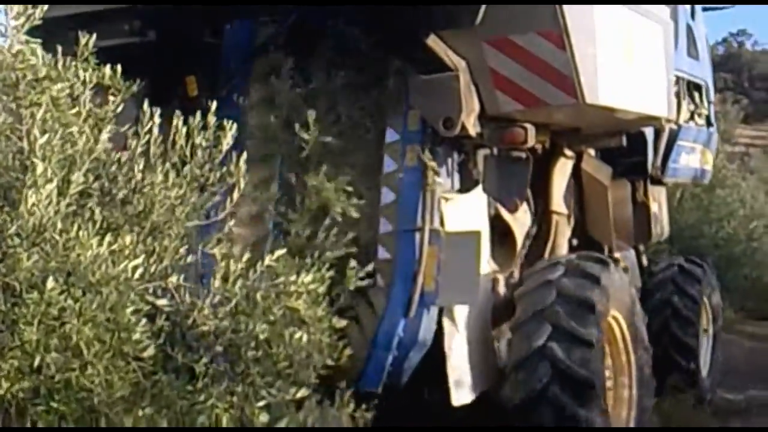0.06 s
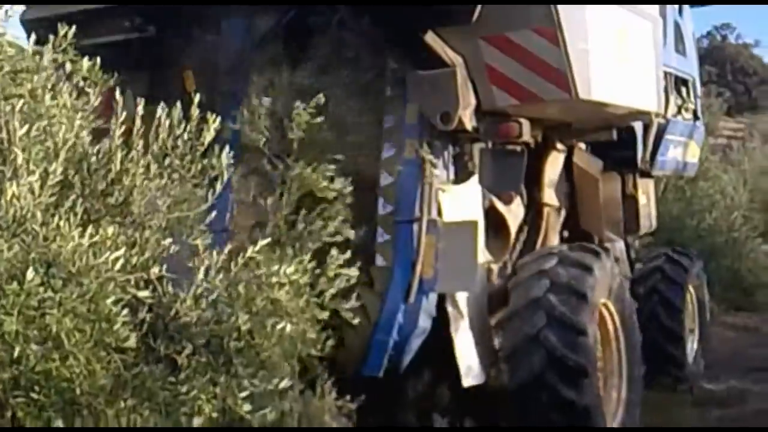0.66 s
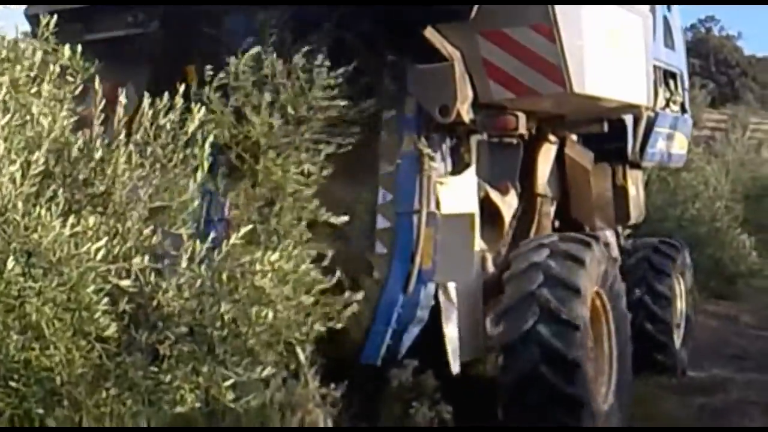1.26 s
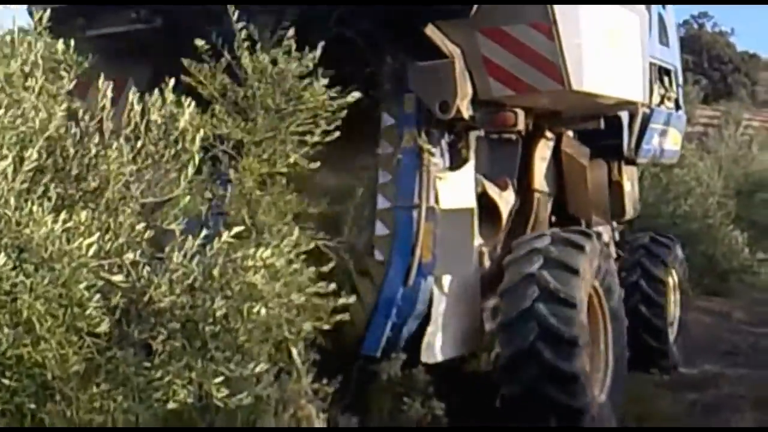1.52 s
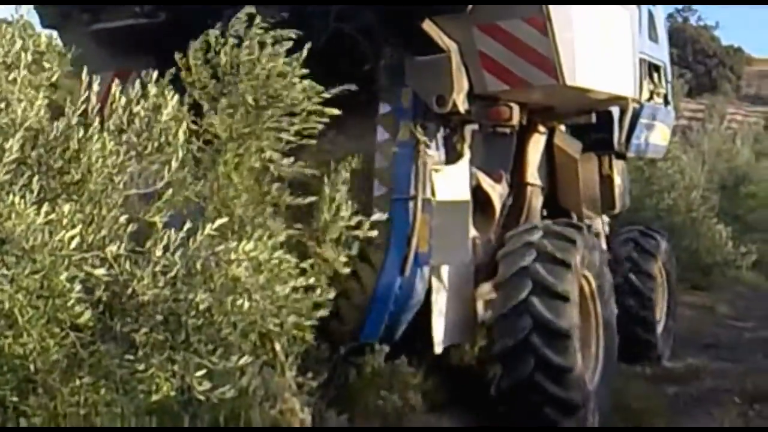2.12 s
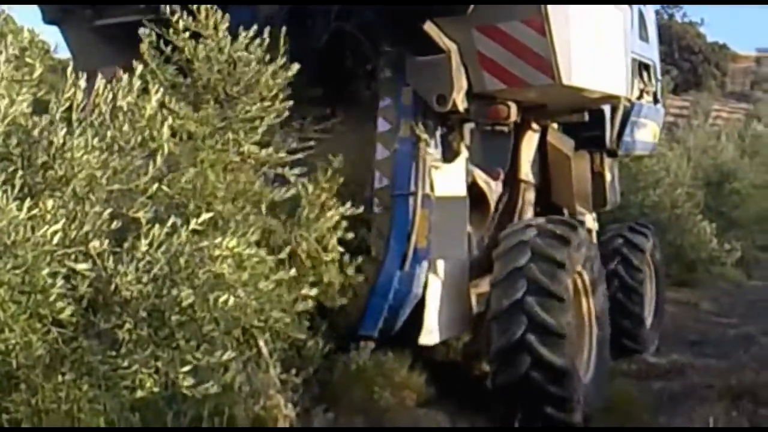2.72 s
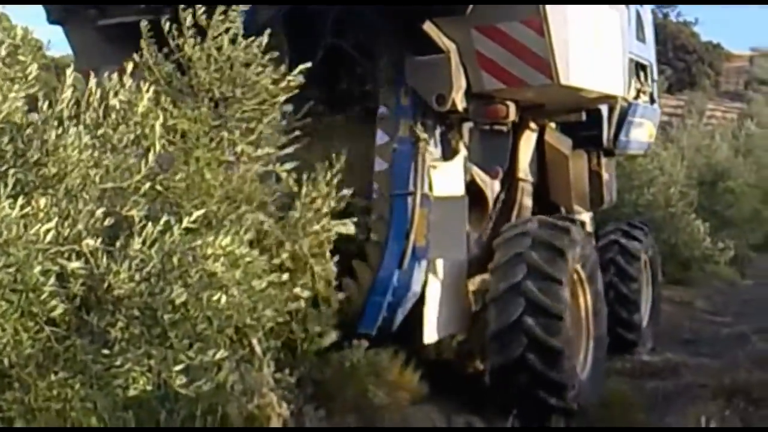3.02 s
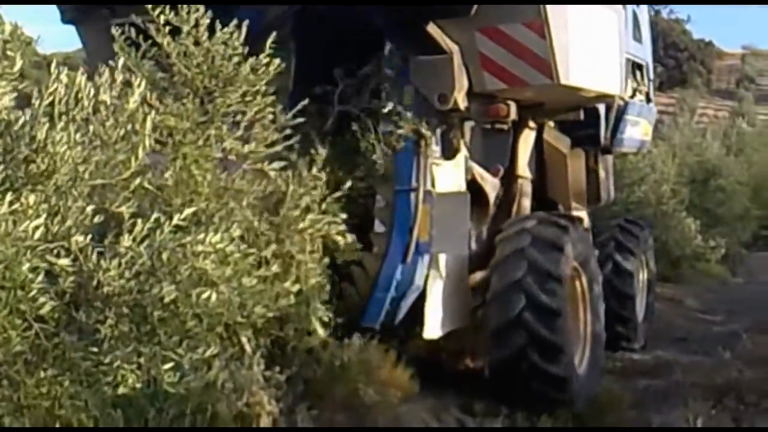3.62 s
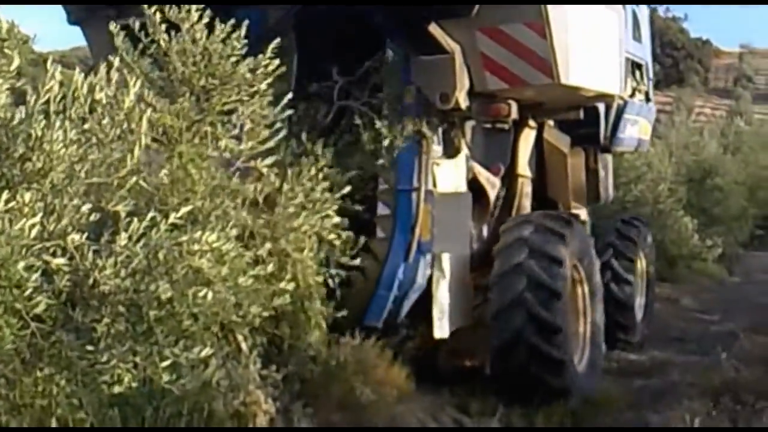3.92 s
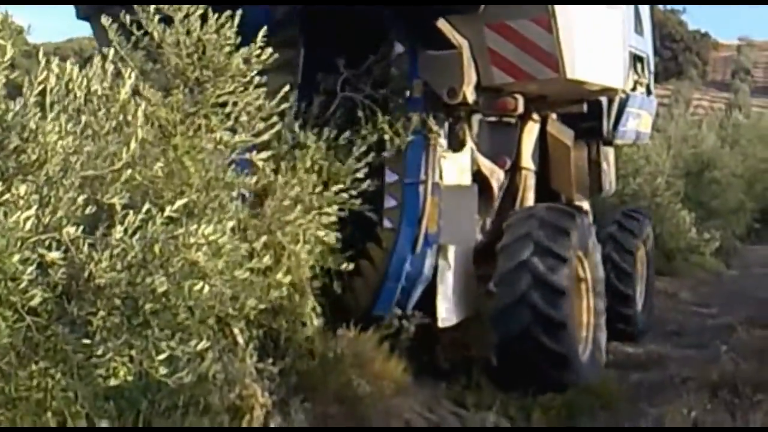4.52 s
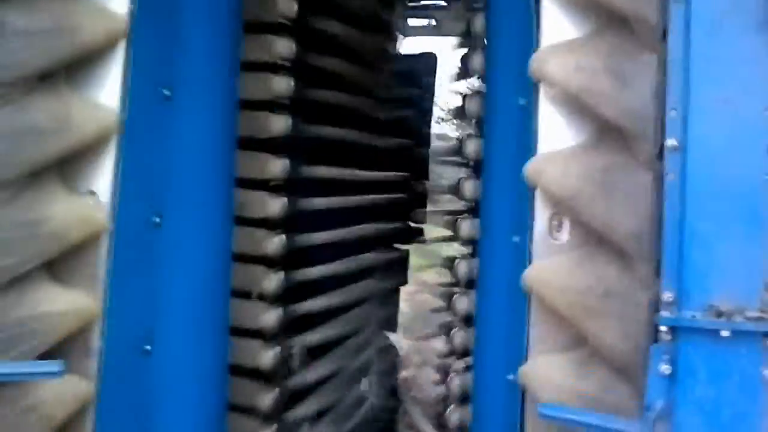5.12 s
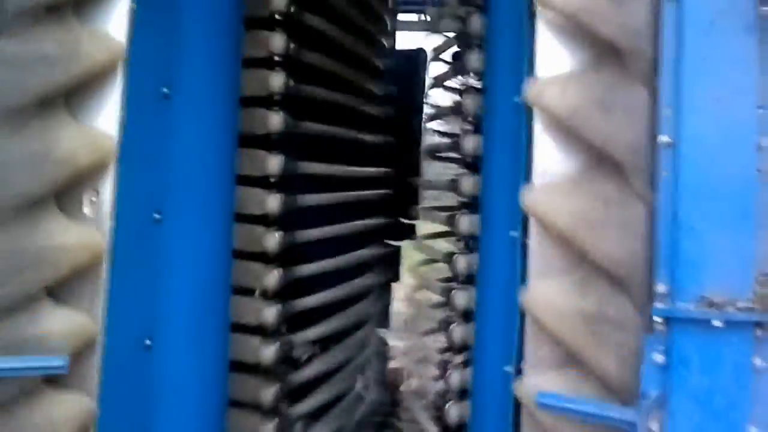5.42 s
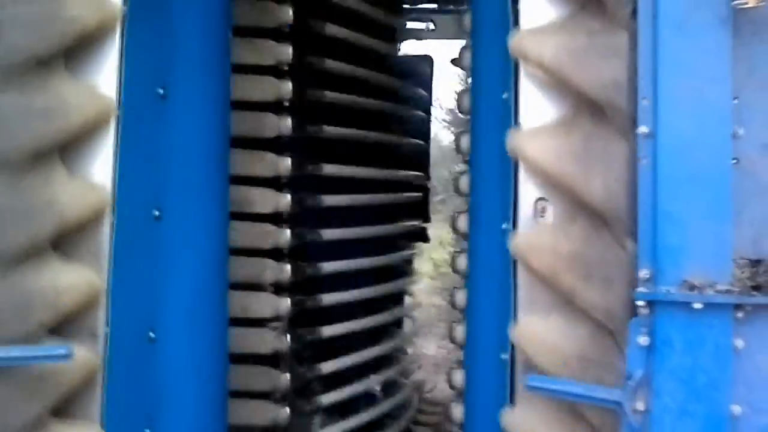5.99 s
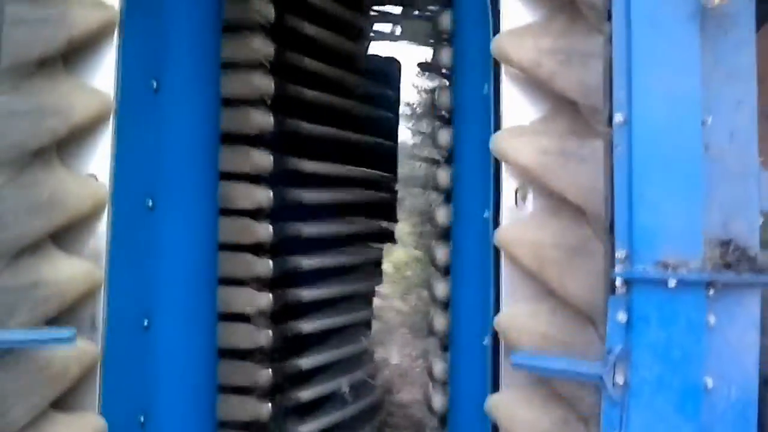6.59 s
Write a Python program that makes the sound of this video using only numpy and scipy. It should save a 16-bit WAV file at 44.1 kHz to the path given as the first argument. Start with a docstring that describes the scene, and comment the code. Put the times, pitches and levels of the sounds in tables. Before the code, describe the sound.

From the start, a large harvester is heard close by outdoors: a loud, steady diesel hum, a roar of air and two blower fans whose low drones beat slowly against each other. Over this, shaker rods thrash the branches about eight times a second, making a dense, throbbing, slightly metallic rustle. A branch squeaks briefly at about 0.8 seconds. Twigs snap at irregular moments, mostly between 0.8 and 2 seconds and again from 4.1 to 4.8. At 5 seconds everything cuts to silence. At about 5.2 seconds the machine returns, heard from its picking tunnel, duller and boxier, with the fan pitched slightly higher. Leaves and fruit gush through with a few snaps around 5.3 seconds, and the roar eases a little near 5.5. Another rustling swell with light clicks comes around 6.5 seconds, and the drone continues to the end, near 6.7 seconds.

```python
"""Olive harvester at work

An olive harvester straddles a tree row: the diesel hums, two blower fans drone and beat,
and shaker rods thrash the branches about eight times a second while twigs snap.
After a short silence it is heard from its picking tunnel, duller, the fan a little faster."""
import sys
import numpy as np
from scipy import signal
from scipy.fft import rfft, irfft
from scipy.io import wavfile

SR = 44100
rng = np.random.default_rng(int(sys.argv[2]) if len(sys.argv) > 2 else 0)


def inscribe(sig):
    """Save sig as 16-bit PCM at rate SR to the path in sys.argv[1].

    A 1-D sig is mono; a 2-D sig holds one channel per row.
    Samples are clipped to [-1, 1] before scaling.
    """
    pcm = np.round(np.clip(np.atleast_2d(sig).T, -1, 1) * 32767)
    wavfile.write(sys.argv[1], SR, pcm.astype(np.int16))


N = 297675
TIME_S = np.arange(N) / SR
BINS_HZ = np.fft.rfftfreq(N, 1 / SR)
ROW_END_S, TUNNEL_START_S, LOAD_EASE_S = 5.0, 5.222, 5.5


def amp(db):
    return 10 ** (np.asarray(db) / 20)


def unit_rms(x):
    return x / np.sqrt(np.mean(x ** 2) + 1e-20)


def curve(rows):
    """Straight lines through (time_s, value) points."""
    return np.interp(TIME_S, *np.transpose(rows))


def colour(x, spectrum):
    """Filter x by a spectrum; rms 1."""
    hz, db = np.transpose(spectrum)
    gain = amp(np.interp(np.log(BINS_HZ + 1), np.log(hz), db))
    return unit_rms(irfft(rfft(x) * gain, N))


def wander(rate_hz):
    """Random drift up to rate_hz; rms 1."""
    return unit_rms(irfft(rfft(rng.standard_normal(N)) / (1 + (BINS_HZ / rate_hz) ** 4), N))


def band(x, centre_hz, width_hz):
    """Bell-shaped band of x; rms 1."""
    hz = np.fft.rfftfreq(len(x), 1 / SR)
    return unit_rms(irfft(rfft(x) * np.exp(-((hz - centre_hz) / width_hz) ** 2), len(x)))


def ruffle(flutter, flutter_hz):
    """Complex gain: turbulent air shakes a tone's strength and phase."""
    return 1 + flutter * (wander(flutter_hz) + 1j * wander(flutter_hz))


def tone(cycles, flutter, flutter_hz):
    """Ruffled sine; rms 1."""
    return unit_rms((ruffle(flutter, flutter_hz) * np.exp(2j * np.pi * (cycles + rng.random()))).real)


def crackle(per_s, spread_db):
    """Many tiny impacts, a few large; rms 1."""
    size = amp(spread_db * np.minimum(rng.exponential(1, N), 5))
    return unit_rms(size * rng.standard_normal(N) * (rng.random(N) < per_s / SR))


def tunnel_load():
    """The load eases smoothly from 1 to 0."""
    return .5 - .5 * np.tanh((TIME_S - LOAD_EASE_S) / 0.072)


# Engine and hydraulic tones at each position: pitch_hz, level_db
ROW_ENGINE_TONES = [(71.5, -38), (119.3, -29.5), (272, -27.5), (357.7, -33), (543, -30), (715.5, -37.5),
                    (815, -36.5), (953, -37.5), (1086, -48)]
TUNNEL_ENGINE_TONES = [(113, -37), (274, -27.5), (339, -31), (548, -32.5)]

def engine(tones):
    """Diesel and pump tones share one slightly unsteady shaft speed."""
    shaft_s = np.cumsum(1 + 0.001973 * wander(1.58)) / SR
    return sum(amp(db) * tone(hz * shaft_s, flutter=0.33, flutter_hz=12) for hz, db in tones)


# Housing resonances and hollows: centre_hz, width_hz, gain_db
HOUSING_BANDS = [(1500, 70, -3.5), (1690, 130, 1.5), (2040, 80, -1.5), (2250, 90, 1.5), (2490, 70, -2.5),
                 (2650, 90, 2), (3150, 130, -3), (3480, 110, 2.5), (4130, 90, -2), (4700, 130, 1.5),
                 (5300, 110, -3), (5510, 90, 2.3), (5690, 70, -2), (5880, 110, 1.5), (6170, 80, -2),
                 (6350, 90, 1), (6520, 70, -1.5), (6720, 110, 1.5), (7380, 80, -1.5), (7650, 130, 2),
                 (8900, 200, -2), (9280, 150, 1), (11200, 250, -1.5), (11900, 250, 2)]

def housing(x):
    """Panels and cavities colour the noise hollow and metallic."""
    gain_db = sum(db * np.exp(-((BINS_HZ - hz) / width_hz) ** 2) for hz, width_hz, db in HOUSING_BANDS)
    return irfft(rfft(x) * amp(gain_db), N)


# Thrashing strength: time_s, level_db
THRASH_LEVELS = [(0, -18), (.15, -18.5), (.62, -20.5), (.79, -17.5), (.95, -18.5), (1.7, -19), (1.92, -18),
                 (2.4, -19), (2.9, -21), (3.4, -18.5), (3.9, -20.5), (4.12, -19), (4.33, -21.5),
                 (4.8, -19.5)]

def thrash_db():
    """The thrashing rises and falls as thick and thin foliage passes."""
    return curve(THRASH_LEVELS)


# Roar beside the row: freq_hz, relative_db
ROW_ROAR_SPECTRUM = [(18, -31.5), (42, -6.5), (100, -3), (170, -3), (370, -5), (430, -1), (510, -3),
                     (700, -14), (880, -6.5), (1030, -15), (1300, -11), (2000, -34.5), (4000, -33),
                     (15000, -50)]

def row_roar():
    """Blower air and machinery roar, partly following the thrashing."""
    swing_db = thrash_db() - thrash_db().mean()
    air = colour(rng.standard_normal(N), ROW_ROAR_SPECTRUM)
    return air * amp(-16 + .3 * swing_db + 0.88 * wander(30))


# Roar in the tunnel: freq_hz, relative_db
TUNNEL_ROAR_SPECTRUM = [(25, -17), (70, -9), (130, 1.5), (290, 4.5), (420, -4), (520, -7), (730, -1),
                        (1000, -12.5), (1380, -5), (1550, -14.5), (1900, -14.5), (2400, -21), (5000, -30),
                        (8000, -35), (15000, -53)]

def tunnel_roar():
    """Boxy roar between the panels, louder under load."""
    air = colour(rng.standard_normal(N), TUNNEL_ROAR_SPECTRUM)
    return air * amp(-17.5 + 2.5 * tunnel_load() + 0.56 * wander(24))


# One stroke of the rods, out and back: cycle_fraction, full_depth_db
ROD_STROKE = [(0.06, 1.8), (0.26, -1.5), (0.41, 1.5), (0.63, 2.5), (0.81, 0.8), (0.93, 1.5)]

def shaker_gain(depth, shake_hz=7.8):
    """The rods whip the branches to and fro, so the leaf noise throbs."""
    cycle_fraction, db = np.transpose(ROD_STROKE)
    return amp(depth * np.interp(shake_hz * TIME_S, cycle_fraction, db, period=1))


# Rustle in the tunnel: freq_hz, relative_db
RUSTLE_SPECTRUM = [(800, -3), (2000, 6), (3200, 2.5), (4600, -4), (5600, -3), (8300, -25), (8900, -11),
                   (11800, -19), (13200, -15), (15700, -31)]
# Gushes of crop: centre_s, half_length_s, rise_db
CROP_GUSHES = [(5.32, 0.073, 7), (6.47, 0.089, 4.5), (6.67, .06, 1.5)]

def tunnel_rustle():
    """Leaves and fruit rustle through the tunnel, swelling at each gush."""
    gush_db = sum(db * np.exp(-((TIME_S - centre_s) / half_s) ** 4)
                  for centre_s, half_s, db in CROP_GUSHES)
    impacts = crackle(per_s=16000, spread_db=2.1) * shaker_gain(depth=0.24)
    return colour(impacts, RUSTLE_SPECTRUM) * amp(-32 + 0.6 * tunnel_load() + gush_db)


# Thrashed foliage: freq_hz, relative_db
FOLIAGE_SPECTRUM = [(500, -9), (1200, -2.5), (1700, 1), (2300, 1), (2950, -11.5), (3450, -5), (4500, -10),
                    (5300, -14.5), (7300, -16), (8700, -25.5), (9500, -23.5), (11100, -32), (12200, -30),
                    (15700, -32.5)]

def foliage():
    """Twigs rattle in clumps, each size in its own band; thick branches follow the rods less."""
    twigs, out = crackle(per_s=22000, spread_db=1.0), np.zeros(N)
    deepening = 1 + 0.038 * TIME_S
    for hz in np.linspace(600, 15600, num=13):
        throb = shaker_gain(depth=np.interp(hz, [1500, 4500], [.4, .92]) * deepening)
        clumps = amp(1.32 * wander(22))
        out += band(twigs, hz, width_hz=910) * throb * clumps
    return colour(out, FOLIAGE_SPECTRUM) * amp(thrash_db() + 0.54 * wander(35))


# Partials of a branch squeak: start_s, level_db, length_s, pitch_hz, wobble_hz
SQUEAK_PARTIALS = [(0.757, -15, .095, 1990, 18), (0.772, -17, .034, 1850, 50), (0.758, -26, .04, 3380, 80)]

def branch_squeak():
    """Wood sticks and slips on a panel, singing briefly at unsteady pitches."""
    out, wobble = np.zeros(N), wander(121.5)
    for start_s, db, length_s, pitch_hz, wobble_hz in SQUEAK_PARTIALS:
        swell = np.sin(np.pi * np.clip((TIME_S - start_s) / length_s, 0, 1))
        cycles = np.cumsum(pitch_hz + wobble_hz * wobble) / SR
        out += amp(db) * swell * np.sin(2 * np.pi * cycles)
    return out


# Snapping twigs and pelting fruit: peak_s, level_db, centre_hz, length_s
TWIG_SNAPS = [(0.132, -37.5, 11000, .025), (0.26, -38, 10000, .02), (0.762, -37, 12000, .022),
              (0.818, -31, 13000, .018), (0.934, -32, 11000, .006), (0.968, -24, 5200, .025),
              (1.2, -33, 12500, .035), (1.345, -26, 6500, .012), (1.425, -26.5, 7000, .014),
              (1.798, -38, 11500, .02), (1.912, -26, 5200, .028), (2.445, -38, 13000, .018),
              (4.11, -29, 6200, .014), (4.166, -23, 6440, .014), (4.379, -32, 12000, .008),
              (4.499, -36, 13000, .009), (4.545, -29, 5500, .021), (4.798, -25.5, 7000, .01),
              (5.268, -28, 5000, 0.01), (5.27, -35, 12500, .014), (5.353, -31, 13000, .02),
              (6.045, -43, 9000, .012), (6.5, -37, 10000, .02), (6.584, -36, 12000, .015),
              (6.692, -40, 12000, .02)]

def twig_snaps():
    """Each snap is a clump of tiny cracks that builds as the twig bends, then dies quickly."""
    out, t = np.zeros(N + SR), TIME_S[:SR // 4]
    cracks = crackle(per_s=30000, spread_db=0.5)
    for peak_s, db, hz, length_s in TWIG_SNAPS:
        rise_s = length_s / 2
        start = max(int((peak_s - rise_s) * SR), 0)
        envelope = t / rise_s * np.exp(1 - t / rise_s)
        clump = band(np.roll(cracks, -start)[:len(t)], hz, width_hz=0.41 * hz)
        out[start:start + len(t)] += amp(db) * clump * envelope
    return out[:N]


# Speed of the nearer fan: time_s, blade_rate_hz
FAN_SPEED = [(0, 168.2), (0.5, 168.25), (1.0, 168.7), (1.6, 168.7), (2.0, 168.1), (2.9, 168.0),
             (3.5, 167.7), (5.0, 167.5), (5.2, 177.1), (6.75, 177.2)]

def blade_passes():
    """Running count of the nearer fan's blade passes."""
    return np.cumsum(curve(FAN_SPEED)) / SR


# Blade tones in the tunnel: harmonic, relative_db
TUNNEL_FAN_HARMONICS = [(1, -7.5), (2, 0), (3, -12.5), (4, -10.5), (5, -14.5), (6, -18.5), (7, -25),
                        (8, -16.5), (9, -32), (10, -26)]

def tunnel_fan():
    """One close fan: a full stack of blade harmonics; the lowest two follow the load and fade."""
    passes, out = blade_passes(), np.zeros(N)
    hum_db = 2.2 * tunnel_load() - 2.4 * (TIME_S - LOAD_EASE_S)
    for k, db in TUNNEL_FAN_HARMONICS:
        level_db = db - 16.5 + (hum_db if k <= 2 else 0)
        out += amp(level_db) * tone(k * passes, flutter=.1, flutter_hz=8)
    return out


# The second fan falls behind the first, then overtakes: time_s, lead_passes
SECOND_FAN_LEAD = [(0, .18), (.5, -.21), (1.2, -.77), (1.6, -1.15), (1.95, -1.22), (2.45, -.9), (3.0, -.48),
                   (3.55, 0), (4.1, .31), (4.6, .46), (5.0, .82)]
# Blade tones as the machine moves off: harmonic, first_db, second_db, slope_db_per_s, flutter_ratio
ROW_FAN_HARMONICS = [(1, -14.5, -15.5, -0.29, 0.05), (2, -20, -38, -1.4, 0.2),
                     (3, -15.5, -24.5, 0.11, 0.18), (5, -30, -42, -1.4, .16), (7, -36, -44.5, -1.3, 0.15)]

def row_fans(duct_shift_cycles=.17):
    """Two fans slip in and out of step, so their tones beat, the higher harmonics faster."""
    passes, lead_passes, out = blade_passes(), curve(SECOND_FAN_LEAD), np.zeros(N)
    for k, first_db, second_db, slope_db_per_s, flutter in ROW_FAN_HARMONICS:
        offset_cycles = k * lead_passes + (k - 1) * duct_shift_cycles
        pair = amp(first_db) + amp(second_db) * np.exp(2j * np.pi * offset_cycles)
        blades = ruffle(flutter, flutter_hz=16) * np.exp(2j * np.pi * (k * passes + rng.random()))
        out += np.sqrt(2) * amp(slope_db_per_s * TIME_S) * (pair * blades).real
    return out


def scene():
    """The machine from beside the row, a short silence, then from its tunnel."""
    row = row_fans() + engine(ROW_ENGINE_TONES) + housing(row_roar() + foliage()) + branch_squeak()
    tunnel = tunnel_fan() + engine(TUNNEL_ENGINE_TONES) + tunnel_roar() + tunnel_rustle()
    row_gate = np.clip((ROW_END_S - TIME_S) / 0.0035 + .5, 0, 1)
    tunnel_gate = np.clip((TIME_S - TUNNEL_START_S) / .012 + .5, 0, 1) ** 2
    return (row_gate * row + tunnel_gate * tunnel + twig_snaps())[None]


def record(dry):
    """Peak limiting at full scale, then a low-pass."""
    knee, cutoff_hz = 20, 15700
    limited = dry / (1 + abs(dry) ** knee) ** (1 / knee)
    lowpass = signal.firwin(701, cutoff_hz, window=("kaiser", 9), fs=SR)
    return signal.oaconvolve(limited, lowpass[None], "same")


dry = scene()
out = record(dry)
inscribe(out)
```